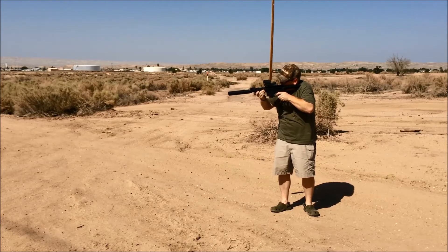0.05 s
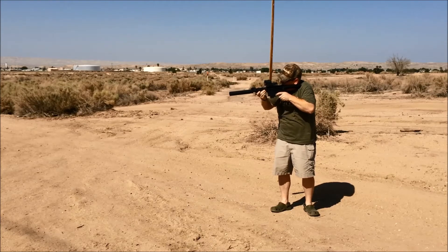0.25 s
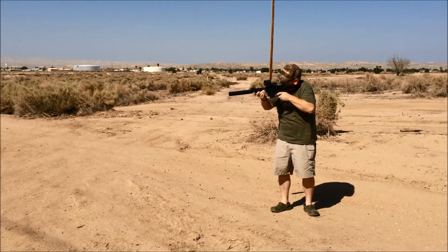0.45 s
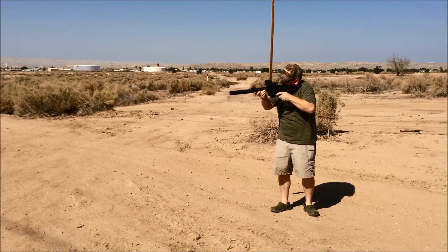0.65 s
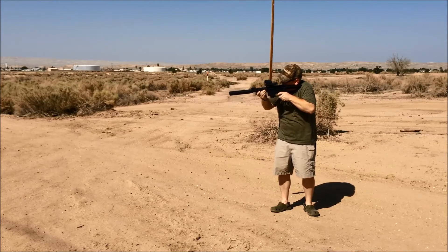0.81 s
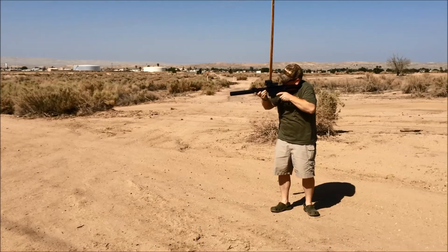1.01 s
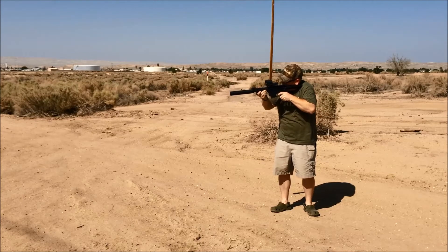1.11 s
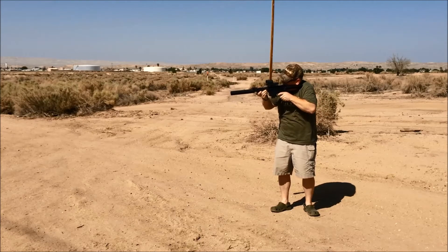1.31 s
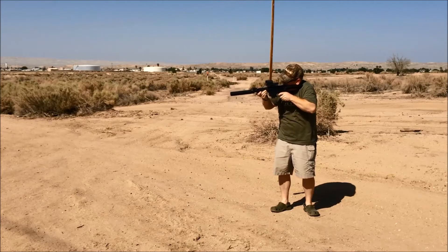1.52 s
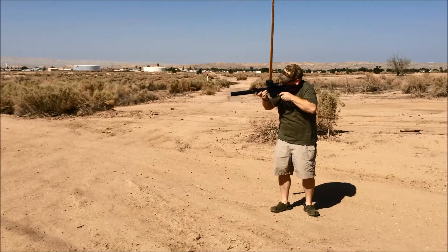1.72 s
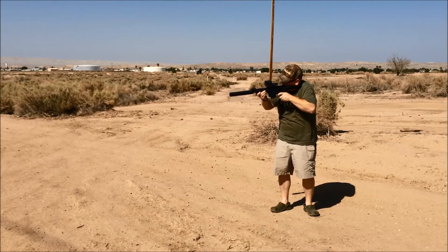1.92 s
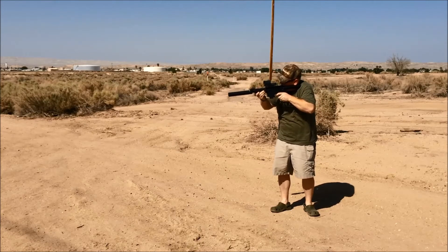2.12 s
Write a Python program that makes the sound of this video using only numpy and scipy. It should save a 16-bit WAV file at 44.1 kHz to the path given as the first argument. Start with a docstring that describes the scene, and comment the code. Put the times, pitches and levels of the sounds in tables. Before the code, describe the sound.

A silenced self-loading gun fires six times in about two seconds: airy spit, hollow pop, metallic double clack, faint bullet hit in dirt. Short scattered outdoor tail, low rumble, close and dry pickup.

```python
"""Six shots from a suppressed self-loading pistol in open desert, a few metres away.
Each shot is shaped noise for the spit of gas, decaying tones for a hollow pop, and a low pressure thump.
Noise bursts and steel modes make the bolt's rear stop, slide, feed and lock-up; bullets smack into dirt.
Scrub scatters a short noise tail; spent cases tink and a faint ricochet sings over a low rumble and hum."""
import sys
import numpy as np
from scipy import signal
from scipy.io import wavfile

SR = 44100
rng = np.random.default_rng(int(sys.argv[2]) if len(sys.argv) > 2 else 0)


def log_audio(samples):
    """Write samples as a 16-bit WAV file to the path given in sys.argv[1]."""
    # one column per channel
    frames = np.atleast_2d(samples).T
    # limit to full scale, then quantise
    limited = np.clip(frames, -1, 1)
    pcm = np.round(limited * 32767).astype(np.int16)
    wavfile.write(sys.argv[1], SR, pcm)


N = 94815
T = np.arange(int(0.25 * SR)) / SR  # time axis of one short event [s]


def amp(db):
    """Decibels to gain."""
    return 10 ** (np.asarray(db) / 20)


def add(mix, time_s, sound):
    """Mixes a sound in at a time, cutting it at the end of the mix."""
    part = mix[max(round(time_s * SR), 0):][:len(sound)]
    part += sound[:len(part)]


def colour(x, spectrum):
    """Minimum-phase filter of unit energy with the given spectrum."""
    hz, db = np.transpose(spectrum)
    bin_hz = abs(np.fft.fftfreq(8192, 1 / SR))
    bin_db = np.interp(np.log(bin_hz + 1), np.log(hz), db)
    log_gain = np.log(amp(bin_db))
    response = np.exp(np.conj(signal.hilbert(log_gain)))
    taps = np.fft.ifft(response).real[:4096]
    return signal.fftconvolve(x, taps / np.linalg.norm(taps))[:len(x)]


def burst(attack_s, hold_s, decay_s):
    """Noise that rises linearly, holds and dies away exponentially."""
    rise = np.minimum(T / attack_s, 1)
    fall = np.exp(-np.maximum(T - hold_s, 0) / decay_s)
    return rng.standard_normal(len(T)) * rise * fall


def thump(width_s, centre_s):
    """One slow swing of air pressure."""
    u = (T - centre_s) / width_s
    return u * np.exp((1 - u ** 2) / 2)


def gritty(x, spread_db, grain_s=0.001):
    """Breaks a sound into uneven grains."""
    knots = np.arange(0, len(x), SR * grain_s)
    grains = np.clip(rng.standard_normal(len(knots)), -2, 2)
    return x * amp(spread_db * np.interp(np.arange(len(x)), knots, grains))


def ring(x, modes):
    """Decaying modes of the metal, each of unit energy before its level, driven by x."""
    body = 0
    for hz, db, t60_s in modes:
        mode = amp(-60 * T / t60_s) * np.sin(2 * np.pi * hz * T)
        body = body + amp(db) * mode / np.linalg.norm(mode)
    return signal.fftconvolve(x, body)[:len(x)]


# shots: (time [s], gas level [dB], gas decay [s], low pop level [dB], low pop pitch [Hz],
#         high pop level [dB], high pop pitch [Hz], thump level [dB])
SHOTS = [(0.2112, -8.5, 0.0071, -9.5, 421.5, -18, 1060, -19),
         (.6330, -11, 0.0083, -20.5, 429, -12, 865, -19), (0.996, -5.5, 0.0037, -10, 743, -17, 1163, -17),
         (1.2890, -7, 0.0044, -23.5, 433, -19.5, 795, -26.5),
         (1.532, -8.5, 0.0059, -17.5, 201, -12, 653, -32), (1.7888, -9, 0.005, -11, 569, -17.5, 977, -32)]
# gas spectrum: (frequency [Hz], level [dB per Hz])
GAS_SPECTRUM = [(40, -7), (170, 9), (300, -6.5), (700, 4), (1100, 6), (1300, 4.5), (1700, 8.5),
                (2500, -0.5), (4000, 2.5), (6200, 7.5), (8500, 4.5), (12000, 5.5), (15000, -1.5)]
# low puff spectrum: (frequency [Hz], level [dB per Hz])
PUFF_SPECTRUM = [(20, -18), (80, -7.5), (300, -3.5), (600, -5), (1500, -20), (15000, -39)]
# suppressor tube modes: (frequency [Hz], level [dB], t60 [s])
TUBE_MODES = [(6250, -6.5, 0.049), (6470, -16.5, 0.036), (7090, -10, .02)]
POP_RISE_S = 0.0026


def muzzle():
    """The spit of gas, with a hollow two-note pop, a thump, a low puff and the ring of the suppressor tube."""
    gas, low, puff = np.zeros((3, N))
    pop = (T / POP_RISE_S * np.exp(1 - T / POP_RISE_S)) ** 2
    for time_s, gas_db, decay_s, low_db, low_hz, high_db, high_hz, thump_db in SHOTS:
        add(gas, time_s, amp(gas_db) * burst(attack_s=0.0008, hold_s=0.005, decay_s=decay_s))
        for pop_db, hz in (low_db, low_hz), (high_db, high_hz):
            add(low, time_s, amp(pop_db) * pop * np.sin(2 * np.pi * hz * T))
        add(low, time_s, amp(thump_db) * thump(width_s=0.002, centre_s=0.0042))
        add(puff, time_s, burst(attack_s=0.00012, hold_s=0.011, decay_s=0.0048))
    tube = amp(-6.5) * ring(gas, TUBE_MODES)
    return colour(gas, GAS_SPECTRUM) + tube + low + amp(-22.5) * colour(puff, PUFF_SPECTRUM)


SWELL_LEAD_S, SWELL_RISE_S, SWELL_DB = 0.038, 0.011, -38


def swell():
    """A soft low swell of noise rises exponentially into each blast."""
    out = np.zeros(N)
    rise = np.exp(np.minimum(T - SWELL_LEAD_S, 0) / SWELL_RISE_S) * (T < SWELL_LEAD_S)
    for time_s, *_ in SHOTS:
        add(out, time_s - SWELL_LEAD_S, rise * rng.standard_normal(len(T)))
    return amp(SWELL_DB) * colour(out, PUFF_SPECTRUM)


BOLT_T60_S = 0.022


def clank(modes):
    """Briefly ringing steel, struck once; each mode is detuned by up to 1 %."""
    tone = 0
    for hz, db in modes:
        tone = tone + amp(db) * np.cos(2 * np.pi * hz * rng.uniform(0.99, 1.01) * T)
    return amp(-60 * T / BOLT_T60_S) * tone


# bolt at its rear stop: (time [s], level [dB])
REAR_STOPS = [(0.235, -8.5), (0.6556, -10), (1.0175, -10), (1.3120, -9.5), (1.5548, -10), (1.8104, -9)]
# a round is stripped from the magazine: (time [s], level [dB])
FEEDS = [(0.273, -20.5), (0.6963, -23), (1.057, -21), (1.3531, -16.5), (1.5949, -18.5), (1.8504, -21)]
# bolt slams shut: (time [s], level [dB], thud level [dB])
LOCKUPS = [(0.2827, -9.5, -53.5), (0.703, -10.5, -47.5), (1.0658, -10.5, -35.5), (1.3614, -12, -56),
           (1.603, -12, -52.5), (1.8580, -9, -27)]
# spectra of rear stop, lock-up, slide and feed: (frequency [Hz], level [dB per Hz])
REAR_SPECTRUM = [(60, 0.5), (300, -18), (850, -13), (1080, 1), (1370, -9), (1600, 0.5), (2100, -7),
                 (2500, -7.5), (3300, -3.5), (6200, 1.5), (10000, -5.5), (15000, -14)]
SHUT_SPECTRUM = [(60, -37), (330, -22.5), (560, 2), (780, -17), (1050, 4), (1500, -3.5), (1900, 4.5),
                 (2500, -2.5), (4400, 5), (7500, 4.5), (10000, 1), (15000, 0.5)]
SLIDE_SPECTRUM = [(100, -16.5), (350, -25), (1100, -9), (2000, -7), (2800, -9), (6200, -0.5), (8500, -2),
                  (11500, -6), (15000, -23.5)]
# bolt modes at rear stop and lock-up: (frequency [Hz], level [dB])
REAR_MODES = [(4400, -16), (6270, -8.5), (1590, -10.5), (1040, -13), (2014, -7)]
SHUT_MODES = [(560, -23.5), (1080, -18.5), (1910, -16.5), (3580, -3), (3680, 0), (4716, -8), (5925, -1.5),
              (6330, 1)]
TRIGGER_LEAD_S, TRIGGER_DB = 0.0232, -45  # small click, likely the trigger
HAMMER_LEAD_S, SLIDE_DELAY_S = 0.0044, 0.027
SHUT_RING_DB = -1.5  # relative to the slam
SPRING_HZ, SPRING_T60_S, SPRING_DB = 15035, 0.17, -26.5  # level relative to the slam


def action():
    """Trigger, hammer fall, rear stop, the scraping slide forward, feeding, and lock-up with the spring ringing."""
    rear, slide, feed, shut, body = np.zeros((5, N))
    for time_s, *_ in SHOTS:
        trigger = burst(attack_s=0.00046, hold_s=0.00096, decay_s=0.007)
        hammer = burst(attack_s=0.00012, hold_s=0.003, decay_s=0.0018)
        scrape = burst(attack_s=0.006, hold_s=0.056, decay_s=0.022)
        add(shut, time_s - TRIGGER_LEAD_S, amp(TRIGGER_DB) * trigger)
        add(shut, time_s - HAMMER_LEAD_S, amp(-29.5) * hammer)
        add(slide, time_s + SLIDE_DELAY_S, amp(-30.5) * scrape)
    for time_s, db in REAR_STOPS:
        add(rear, time_s, amp(db) * burst(attack_s=0.0004, hold_s=0.002, decay_s=0.0035))
        add(body, time_s, amp(db) * clank(REAR_MODES))
    for time_s, db in FEEDS:
        add(feed, time_s, amp(db) * burst(attack_s=0.0008, hold_s=0.003, decay_s=0.002))
    spring = amp(-60 * T / SPRING_T60_S) * np.sin(2 * np.pi * SPRING_HZ * T)
    for time_s, db, thud_db in LOCKUPS:
        add(shut, time_s, amp(db) * burst(attack_s=0.0004, hold_s=0.003, decay_s=0.002))
        add(body, time_s, amp(db + SHUT_RING_DB) * clank(SHUT_MODES))
        add(body, time_s, amp(db + SPRING_DB) * spring)
        add(body, time_s, amp(thud_db) * thump(width_s=0.002, centre_s=0.0022))
    travel = colour(gritty(slide, spread_db=5.0) + feed, SLIDE_SPECTRUM)
    return colour(rear, REAR_SPECTRUM) + colour(shut, SHUT_SPECTRUM) + travel + body


# bullets and flung dirt land downrange: (time [s], level [dB], thud level [dB])
IMPACTS = [(0.3319, -19.5, -30.5), (0.3423, -31, -61.5), (0.745, -25, -42), (0.755, -24.5, -29.5),
           (1.1151, -25, -53), (1.1232, -25.5, -42), (1.3897, -24, -54.5), (1.4116, -24, -39.5),
           (1.657, -30.5, -52), (1.664, -22.5, -40.5), (1.9059, -23, -57), (1.9136, -28, -40)]
# dirt spectrum: (frequency [Hz], level [dB per Hz])
DIRT_SPECTRUM = [(100, -2), (400, -9.5), (1200, -2.5), (2000, 1), (3000, -1), (5000, 1.5), (8000, -2.5),
                 (10000, -7.5), (15000, -12.5)]
THUD_HZ, THUD_RISE_S = 180, 0.0034


def impacts():
    """A gritty noise smack and a dull decaying thud from the dirt."""
    grit, thud = np.zeros((2, N))
    thud_shape = T / THUD_RISE_S * np.exp(1 - T / THUD_RISE_S)
    for time_s, db, thud_db in IMPACTS:
        add(grit, time_s, amp(db) * burst(attack_s=0.00022, hold_s=0.0013, decay_s=0.0058))
        add(thud, time_s, amp(thud_db) * thud_shape * np.sin(2 * np.pi * THUD_HZ * T))
    return colour(gritty(grit, spread_db=4.5), DIRT_SPECTRUM) + thud


# spent cases land: (time [s], tick level [dB], ring level [dB], ring t60 [s])
CASES = [(0, -62, -68, .13), (0.9364, -24.5, -59, 0.27), (1.691, -52, -57, .3), (2.01, -41.5, -60.5, 0.5)]
# two close pitches of the brass: (frequency [Hz], level [dB])
CASE_MODES = [(10595, 0), (10690, -2)]


def cases():
    """Spent brass ticks on the ground and rings thinly, fluttering as it tumbles."""
    tick, brass = np.zeros((2, N))
    t = np.arange(SR) / SR
    tone = sum(amp(db) * np.sin(2 * np.pi * hz * t) for hz, db in CASE_MODES)
    for time_s, tick_db, ring_db, t60_s in CASES:
        add(tick, time_s, amp([tick_db]))  # one-sample click
        add(brass, time_s, amp(ring_db) * amp(-60 * t / t60_s) * tone)
    return colour(tick, DIRT_SPECTRUM) + gritty(brass, spread_db=3, grain_s=0.007)


WHINE_START_S, WHINE_HZ, WHINE_SAG_HZ_PER_S = 0.34, 836, 130
WHINE_DB, WHINE_FADE_DB_PER_S, WHINE_FIFTH_DB = -68.5, 27.5, -9


def ricochet():
    """A tumbling bullet whines away on two notes a fifth apart, falling in pitch."""
    t = np.maximum(np.arange(N) / SR - WHINE_START_S, 0)
    phase = 2 * np.pi * np.cumsum(WHINE_HZ - WHINE_SAG_HZ_PER_S * t) / SR
    notes = np.sin(phase) + amp(WHINE_FIFTH_DB) * np.sin(1.5 * phase)
    return np.minimum(t / 0.02, 1) * amp(WHINE_DB - WHINE_FADE_DB_PER_S * t) * notes


# near and far scatter spectra: (frequency [Hz], level [dB per Hz])
NEAR_SPECTRUM = [(60, -22), (400, -17.5), (1100, -6.5), (2800, -3.5), (4200, -2.5), (6200, 1.5),
                 (8500, -9.5), (12000, -9.5), (15000, 1)]
FAR_SPECTRUM = [(100, -12), (1000, -3), (2000, 4), (6000, 2), (9000, -9.5), (15000, -24.5)]


def desert(x, near_db, near_t60_s, far_db, far_t60_s):
    """Ground and scrub scatter a quick bright tail and a faint, duller long one, both dying unevenly."""
    t = np.arange(SR) / SR
    near, far = rng.standard_normal((2, SR)) * np.minimum(t / 0.007, 1)
    near = near * amp(-60 * t / near_t60_s)
    far = far * amp(-60 * t / far_t60_s)
    near_tail = amp(near_db) * colour(near / np.linalg.norm(near), NEAR_SPECTRUM)
    far_tail = amp(far_db) * colour(far / np.linalg.norm(far), FAR_SPECTRUM)
    scattered = signal.fftconvolve(x, near_tail + far_tail)[:N]
    return gritty(scattered, spread_db=2.8, grain_s=0.003)


# rumble spectrum: (frequency [Hz], level [dB per Hz])
RUMBLE_SPECTRUM = [(20, -27.5), (50, -17.5), (90, -3), (135, -1), (200, -3.5), (300, -17.5), (500, -24.5),
                   (1200, -30.5), (7000, -37.5), (15000, -47)]
RUMBLE_DB, RUMBLE_FALL_DB_PER_S = -56.5, 0.5


def rumble():
    """Low, gently lumpy outdoor noise that eases off steadily."""
    knots = np.linspace(0, N, num=40)
    lumps_db = 1.5 * np.interp(np.arange(N), knots, rng.standard_normal(len(knots)))
    level_db = RUMBLE_DB - RUMBLE_FALL_DB_PER_S * np.arange(N) / SR + lumps_db
    noise = gritty(rng.standard_normal(N), spread_db=1.6, grain_s=0.012)
    return amp(level_db) * colour(noise, RUMBLE_SPECTRUM)


# wavering hum: (time [s], pitch [Hz], level [dB])
HUM = [(0, 110.8, -52.5), (0.149, 148.1, -51), (0.559, 136.2, -51.5), (0.952, 99.3, -52),
       (2.15, 91.64, -58.5)]


def hum():
    """A far low sine hum that drifts in pitch and level."""
    time_s, hz, db = np.transpose(HUM)
    t = np.arange(N) / SR
    phase = 2 * np.pi * np.cumsum(np.interp(t, time_s, hz)) / SR
    return amp(np.interp(t, time_s, db)) * np.sin(phase)


def scene():
    """Sums all layers; the blast lights up the landscape more than the action does."""
    blast, metal, dirt = swell() + muzzle(), action(), impacts()
    tail = desert(blast + dirt + amp(-3.0) * metal,
                  near_db=-14.5, near_t60_s=0.16, far_db=-44.5, far_t60_s=0.94)
    return (blast + metal + dirt + tail + cases() + ricochet() + rumble() + hum())[None]


LOW_CUT_HZ, HIGH_CUT_HZ = 14, 15400


def record(dry):
    """The microphone sheds the deepest bass and the loudest peaks overload softly; then the band limit."""
    low_cut = signal.butter(2, LOW_CUT_HZ, "high", fs=SR, output="sos")
    dry = signal.sosfilt(low_cut, dry)
    ceiling = amp(-1.2)
    limited = dry / (1 + (dry / ceiling) ** 4) ** 0.25
    band_limit = signal.firwin(301, HIGH_CUT_HZ, window=("kaiser", 8), fs=SR)
    return signal.oaconvolve(limited, band_limit[None], "same")


dry = scene()
out = record(dry)
log_audio(out)
```